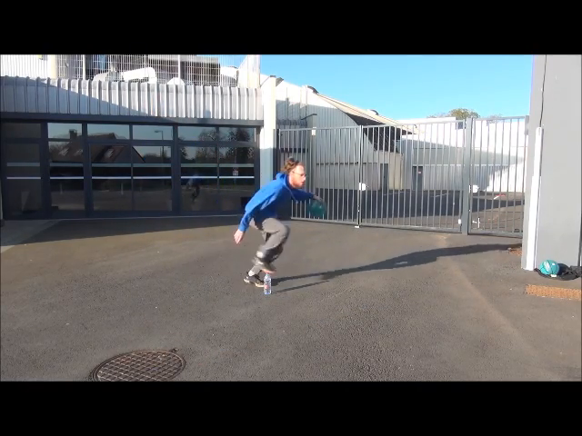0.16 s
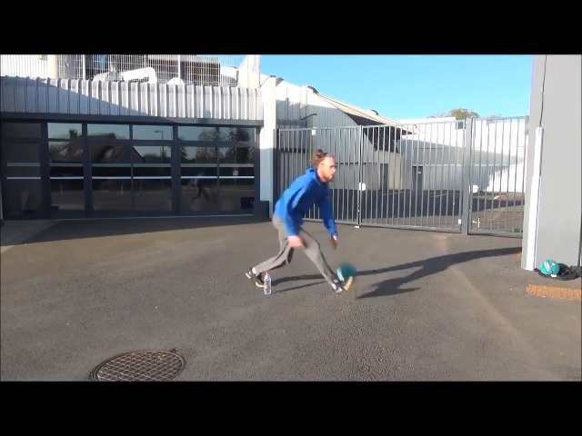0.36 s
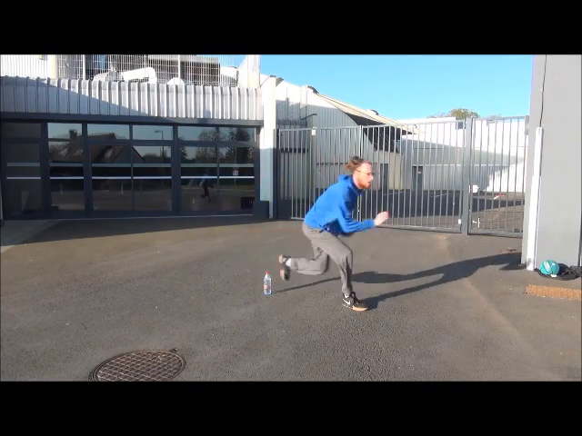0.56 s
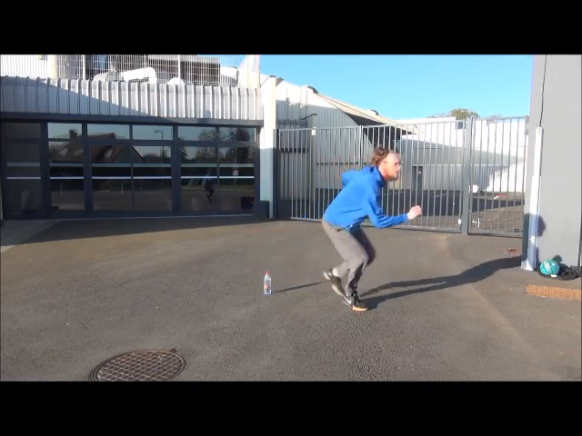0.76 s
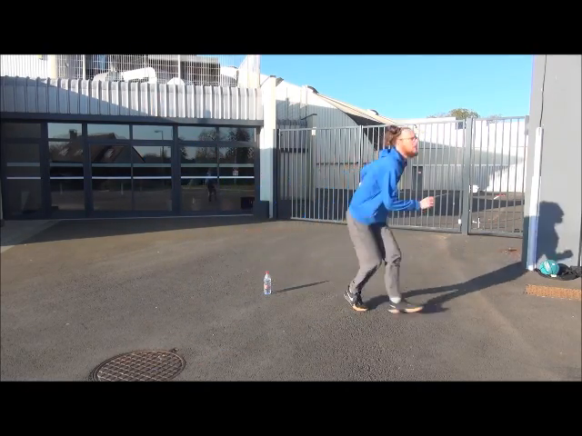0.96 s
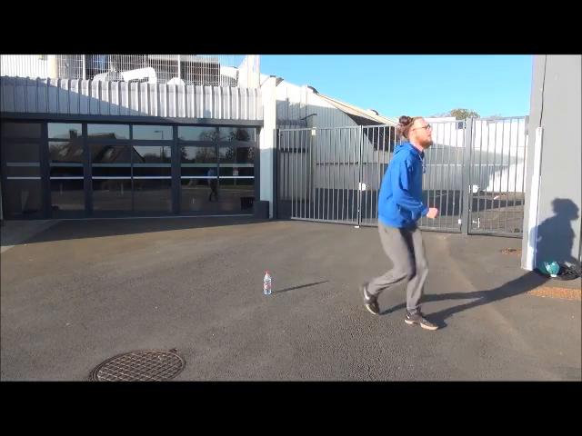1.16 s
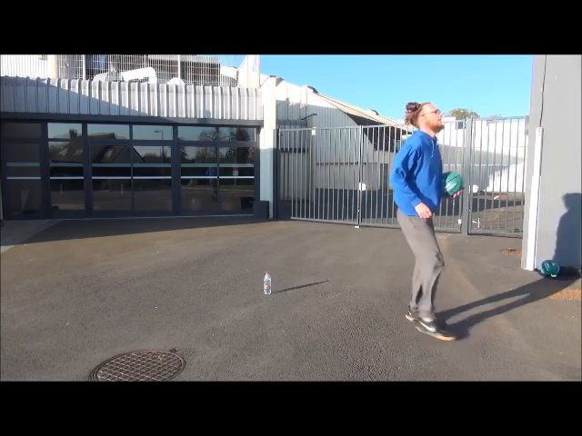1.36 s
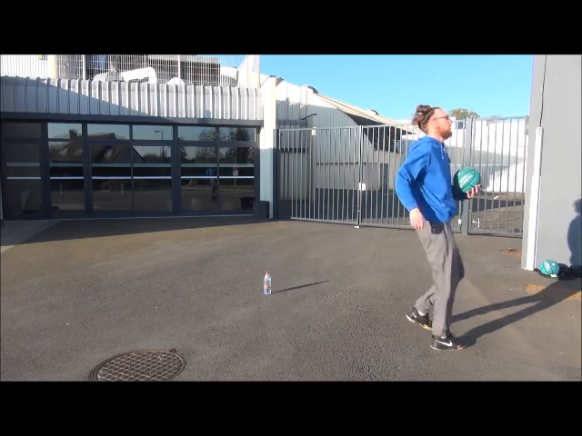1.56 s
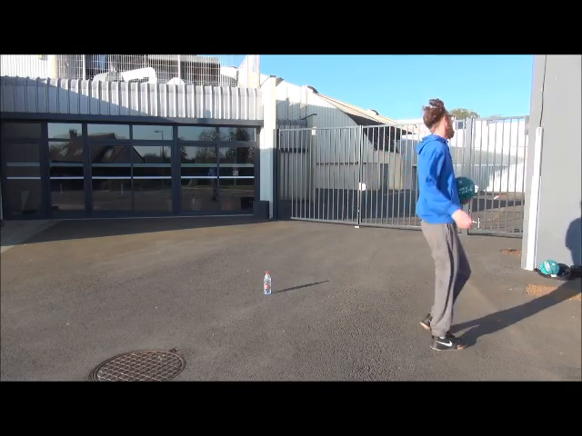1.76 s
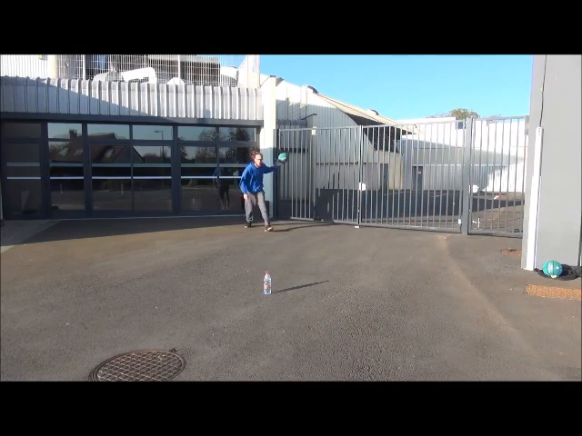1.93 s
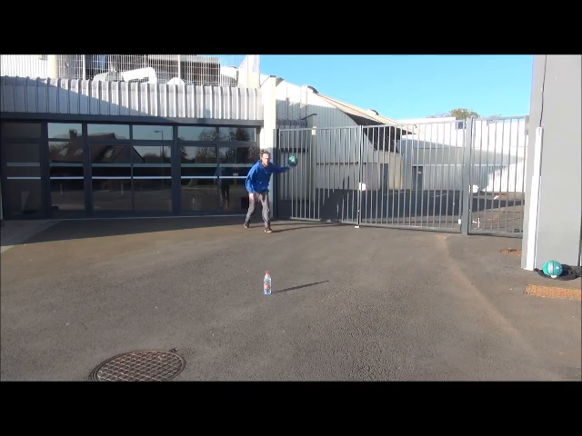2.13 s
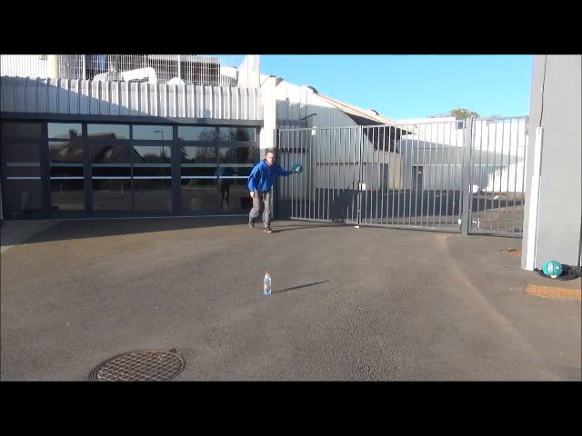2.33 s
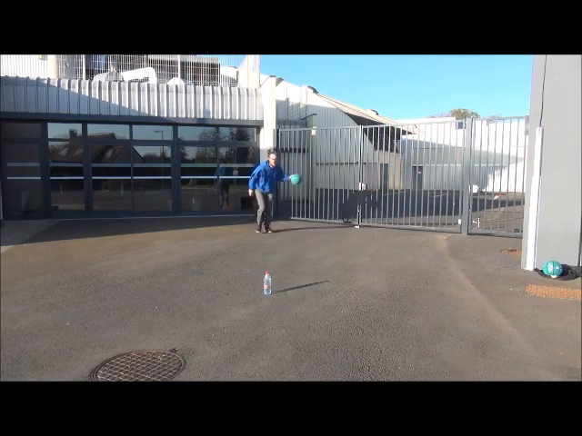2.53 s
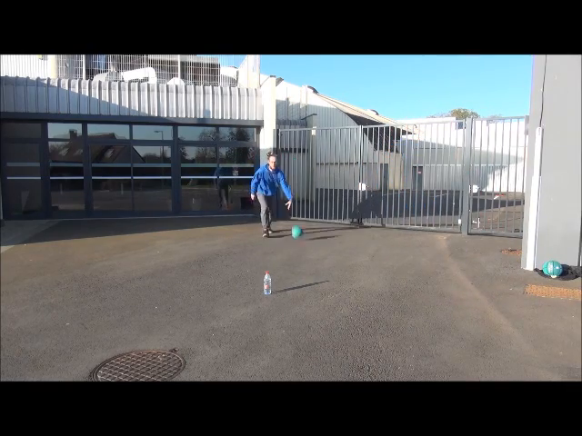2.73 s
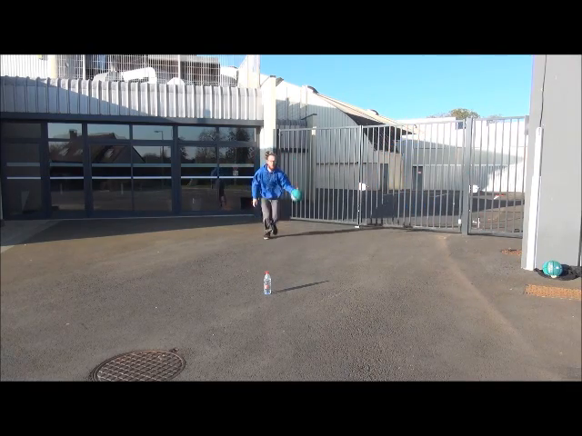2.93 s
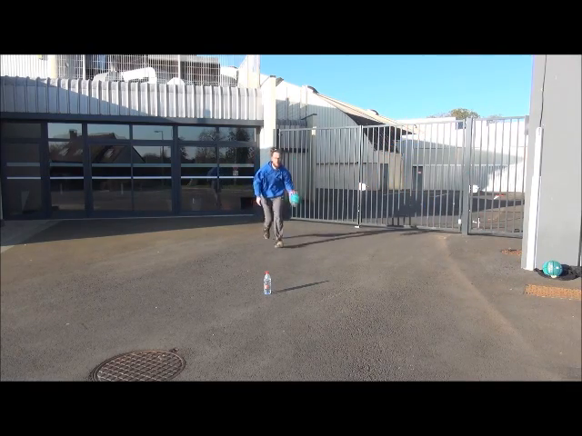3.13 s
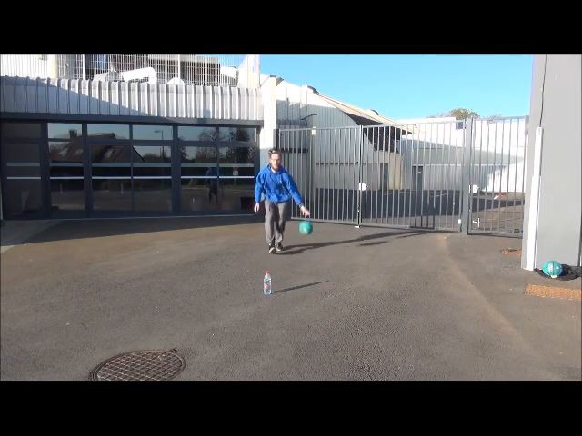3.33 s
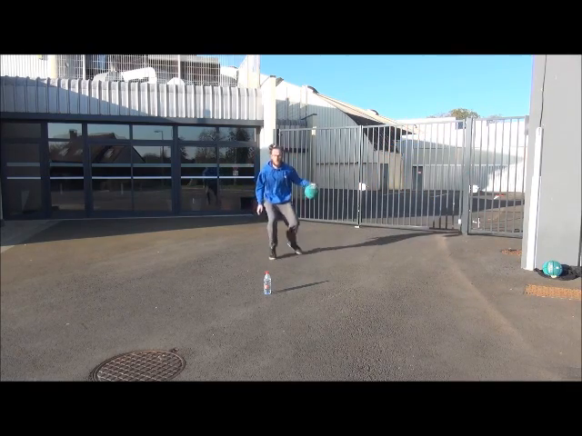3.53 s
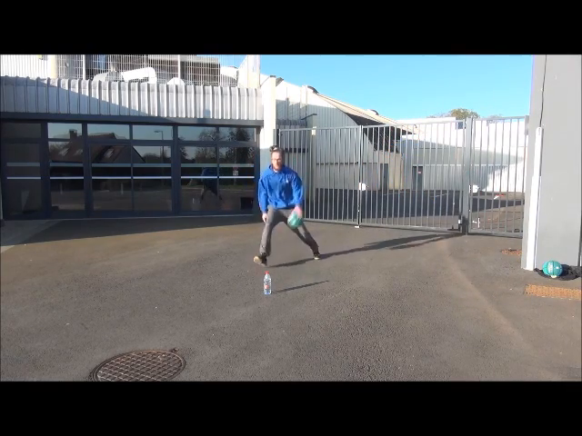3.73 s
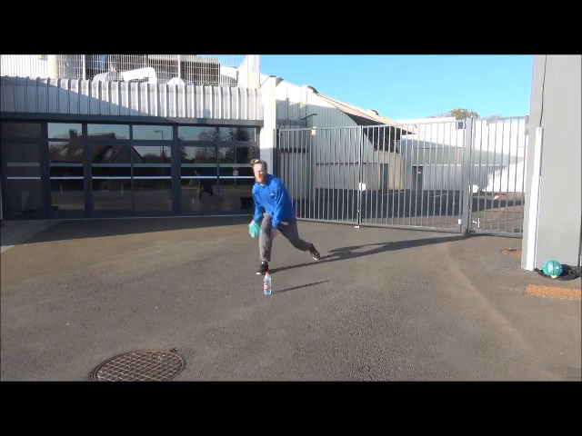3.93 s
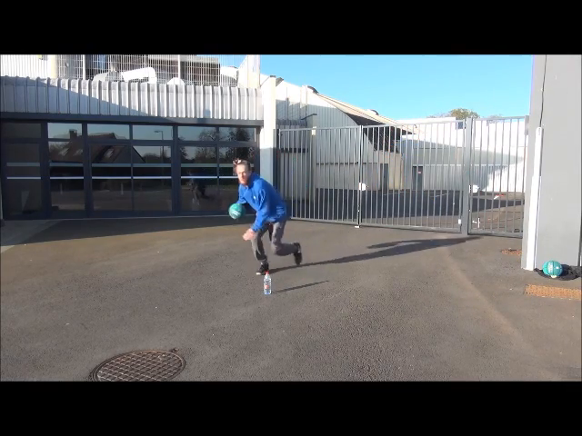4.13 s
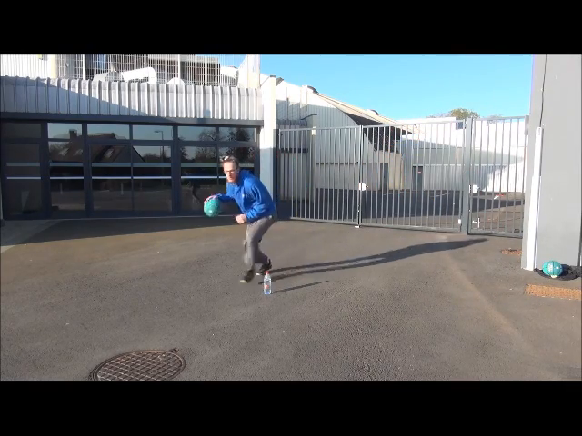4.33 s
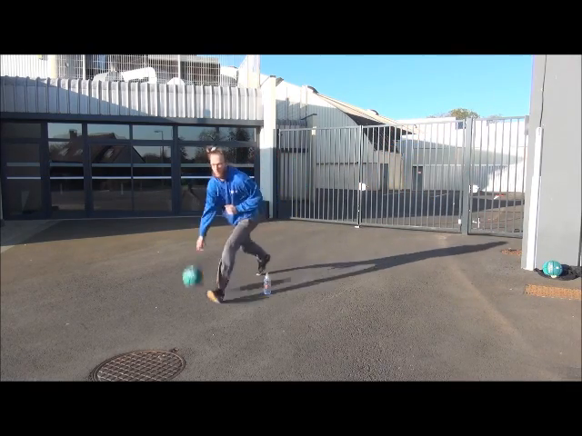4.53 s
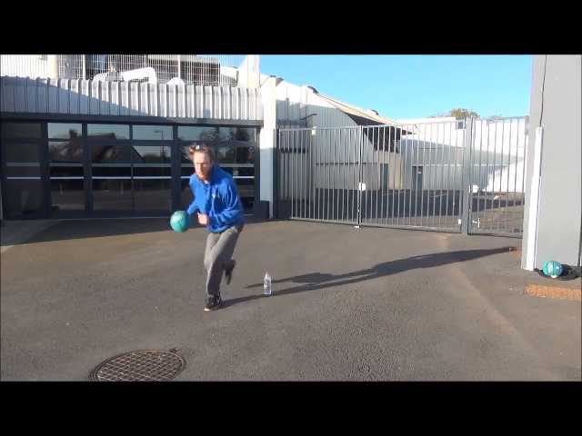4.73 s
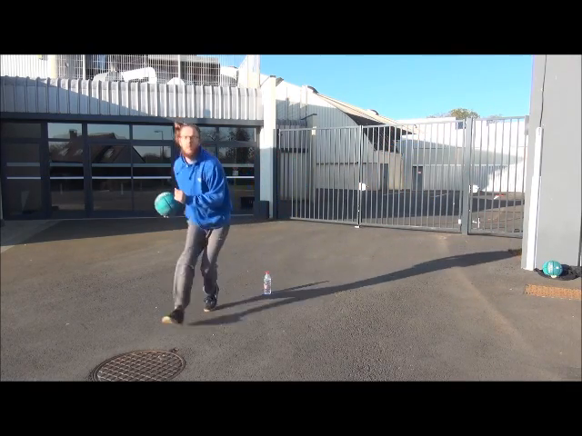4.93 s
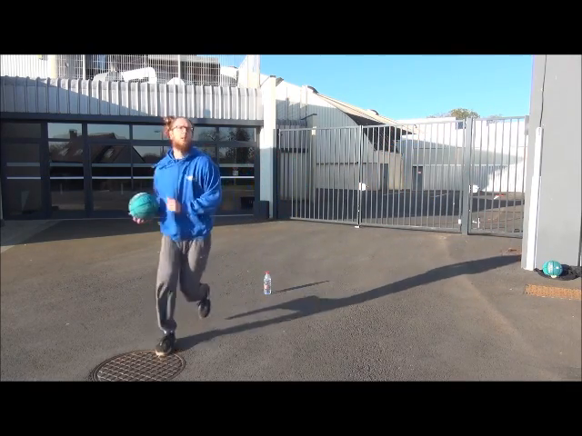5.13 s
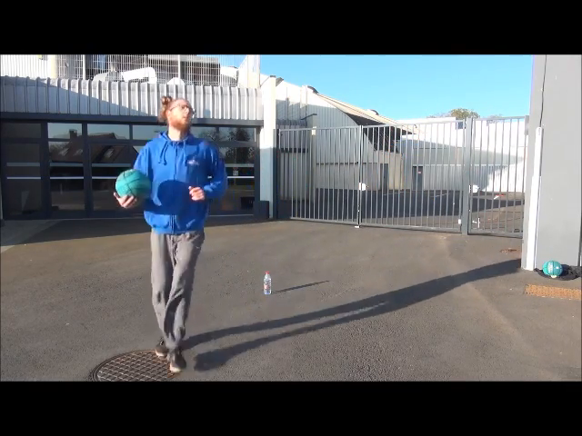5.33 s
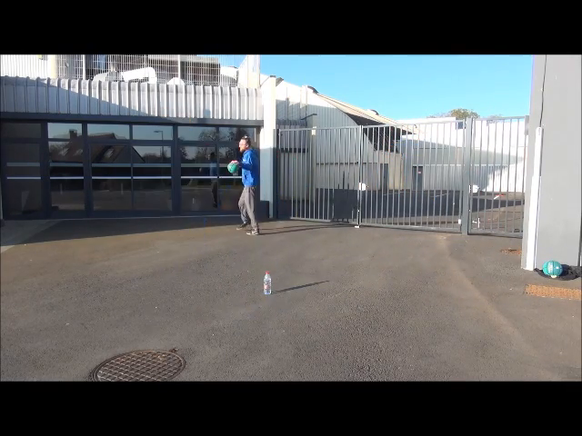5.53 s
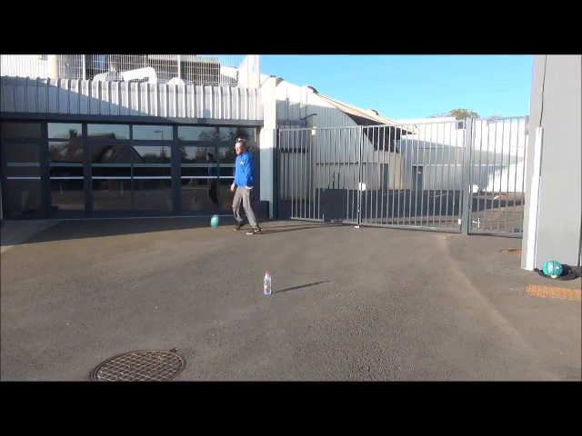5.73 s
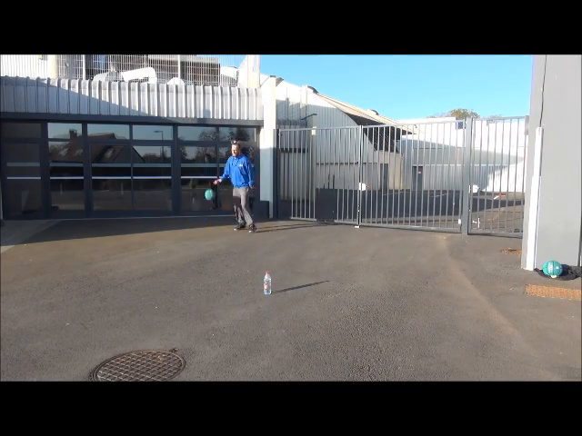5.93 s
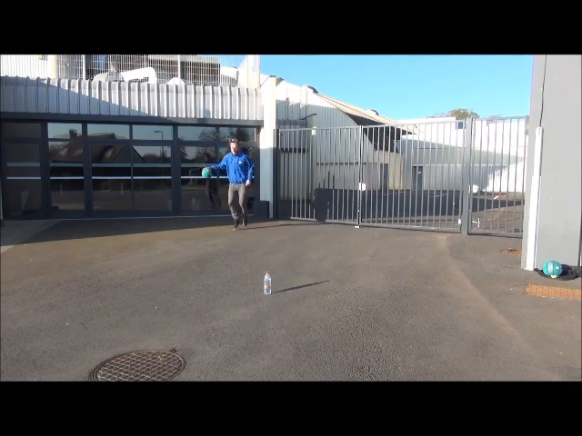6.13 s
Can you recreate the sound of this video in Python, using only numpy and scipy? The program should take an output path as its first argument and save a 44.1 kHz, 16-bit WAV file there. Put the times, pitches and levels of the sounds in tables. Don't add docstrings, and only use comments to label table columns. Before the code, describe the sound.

A paved outdoor yard with hard walls, heard from a fixed stereo microphone over quiet distant traffic and uneven low wind. Faint grit slides come first, then at about 0.46 s a rubber ball hits asphalt: bright slap, brief hollow ring, low thump, quick smeared wall echoes and a short reverberant tail. A long pause holds soft footfalls and a gritty sole drag from 1.6 to 1.95 s. Bounces return at 2.85, 3.36, 3.93 and 4.6 s, varying in pitch, with scuffs and small squeaks around 3.2 s and a strong scuff at 4.13 s. The 4.6 s hit is full and close, and a drain cover rings thinly after it. A low fan hum swells around 4 to 4.8 s; faint high whines come and go. Dull thuds cluster at 5.5 to 5.8 s before a hard, dry final slap at 5.88 s, its echo still fading at the end, 6.3 s.

```python
import sys
import numpy as np
from scipy import signal
from scipy.io import wavfile
from scipy.ndimage import uniform_filter1d

SR = 44100
rng = np.random.default_rng(int(sys.argv[2]) if len(sys.argv) > 2 else 0)


def inscribe(sig):
    pcm = np.round(np.clip(np.atleast_2d(sig).T, -1, 1) * 32767)
    wavfile.write(sys.argv[1], SR, pcm.astype(np.int16))


def convert_level_to_amplitude(level_db):
    exponent = np.asarray(level_db, float) / 20
    return 10 ** exponent


N = 276948

# pitch in Hz, level in dB per Hz.
TRAFFIC_COLOUR = [(30, -8), (60, -7), (120, -14), (250, -5.5), (500, -8), (900, -6.5), (1700, -12),
                  (3300, -15), (5600, -23.5), (8000, -29.5), (11000, -37)]
# time in seconds, level in dB, left minus right in dB.
TRAFFIC_LEVEL = [(0, -47, -0.6), (.9, -49, -0.3), (1.7, -48, -1), (2.25, -51, 1.4), (2.8, -47.5, 1),
                 (3.7, -50, -0.5), (4.2, -47, 0.5), (4.55, -51, 1.2), (5.1, -47.5, 1.3), (5.6, -48.5, -1),
                 (6.28, -46.5, -2)]
# time in seconds, level in dB.
WIND_LEVEL = [(0, -55), (.9, -43.5), (1.25, -64), (1.45, -43), (1.95, -55), (2.25, -49.5), (2.65, -99),
              (2.8, -43.5), (3.3, -50), (3.55, -40.5), (3.75, -47.5), (4.2, -38.5), (4.55, -42),
              (4.75, -35.5), (5.1, -46.5), (5.6, -49.5), (6.15, -41), (6.28, -54)]
# middle in seconds, half length in seconds, level in dB.
FAN_SWELLS = [
    (1.25, .15, -70),
    (2.453, 0.27, -56.5),
    (3.598, 0.11, -67),
    (4.12, 0.44, -41.5),
    (4.703, 0.21, -40.5),
    (5.67, 0.18, -44),
    (5.997, 0.26, -48),
]
FAN_HZ, FAN_REST_DB = 143.4, -59.5
# pitch in Hz, width in Hz, level in dB.
WHINE_LINES = [(3100, 450, 0), (5500, 330, 0)]
# start in seconds, length in seconds, level in dB.
WHINE_SPELLS = [
    (1.0, .38, -64),
    (2.56, .3, -62),
    (3.96, .34, -60),
    (5.28, .3, -62),
    (6.08, .2, -62),
]
# start in seconds, length in seconds, pitch in Hz,
# width in Hz, level in dB.
SQUEAKS = [
    (3.186, .032, 3050, 90, -46),
    (3.2, .024, 3600, 90, -48),
    (3.245, .03, 2400, 120, -52),
    (4.88, .24, 4450, 40, -63),
    (5.3, .28, 4450, 50, -63),
    (.55, .07, 1230, 90, -45),
    (.61, .1, 1290, 90, -41.5),
    (.6, .1, 760, 90, -44),
    (2.89, .11, 1250, 250, -40),
    (5.96, .2, 1100, 700, -42),
]
# time in seconds, level in dB,
# centre in Hz, left minus right in dB, length in ms.
THUDS = [(.4, -51, 300, 3, 6.4), (1.138, -42, 170, -7, 10), (1.403, -43.5, 240, -6, 15),
         (1.487, -49, 227, -11, 20), (1.553, -40, 280, -3, 8.1), (2.133, -40.5, 177, 3, 17),
         (2.689, -47, 212, 6, 17), (3.613, -38, 352, -5, 7.5), (4.822, -34, 706, 1.1, 5.6),
         (5.116, -29, 263, 2.5, 3.5), (5.53, -40, 900, 3, 4.9), (5.562, -31, 193, -4.5, 9.1),
         (5.591, -29.5, 163, -4, 21), (5.675, -38.5, 195, -5, 15), (5.721, -35, 162, -3, 19),
         (5.779, -32.5, 188, -3.5, 17), (5.825, -40, 210, -5, 29)]
# time in seconds,
# level in dB, centre in Hz, left minus right in dB, length in ms.
SCUFFS = [(0.458, -35, 347, 11, 3), (0.641, -42, 1200, -3, 15), (0.668, -43, 1970, -2.1, 38),
          (1.241, -35, 1080, -2.5, 1.6), (1.796, -33, 1060, -13, 14), (3.05, -33.5, 1140, 0, 20),
          (3.238, -40.5, 483, 2.1, 9.4), (3.75, -36, 900, 0.1, 1.9), (3.892, -35.5, 496, 3, 3.8),
          (4.117, -38, 1500, 2.1, 10), (4.134, -25.5, 1380, 1.1, 10.4), (4.593, -22, 720, 8, 2.6),
          (4.712, -41, 2740, 3.5, 40), (5.112, -34, 1100, 1, 2.7)]
# time in seconds, level in dB, length in ms.
SLIDES = [(0.144, -48, 5), (0.169, -44, 26), (0.189, -43, 4), (.208, -42, 3.6), (0.579, -51, 18),
          (1.512, -44, 5.9), (3.192, -40.5, 12), (3.238, -33, 10.4), (3.274, -45, 19), (3.471, -38, 5.3),
          (3.55, -43.5, 27), (3.686, -39, 3.1), (3.711, -53, 2.2), (3.726, -46, 2.2), (3.763, -47, 8.9),
          (3.875, -48, 2.5), (3.919, -37, 3.4), (4.115, -39, 14), (4.132, -35, 11.5), (4.712, -42, 17),
          (5.113, -33, 4), (5.254, -39.5, 4.2), (5.7, -49, 41), (5.801, -48.5, 90)]
THUD_HISS_DB, SCUFF_HISS_DB = -23, -15.5
SLIDE_BODY_DB, SLIDE_HZ, SLIDE_PAN_DB = -14, 2140, 1
# time in seconds, pressure in dB.
DRAG_PRESSURE = [(1.61, -31), (1.635, -27.5), (1.65, -33), (1.668, -27.5), (1.69, -34), (1.715, -32),
                 (1.765, -33), (1.85, -39.5), (1.955, -45)]
# pitch in Hz, width in Hz, level in dB.
DRAG_PEAKS = [(490, 70, 1), (680, 60, 0), (1080, 300, -3), (1400, 250, -3), (2000, 330, -2),
              (2700, 700, -7.5), (3800, 1200, -13)]
DRAG_HISS_DB, DRAG_PAN_DB = -27, -5
# pitch in Hz, level in dB, seconds to fade by 60 dB.
DRAIN_COVER = [(2872, -44, 2.1), (2879, -44.5, 2.1), (3520, -48, 1.3), (3900, -50, .9)]
# centre in Hz, level in dB, seconds to fade by 60 dB.
YARD_BANDS = [(120, 11, 0.94), (300, -21, .7), (800, 23.5, 1), (1500, 10.5, 0.72), (2950, 2.5, 1),
              (6000, -44, 0.59), (9500, -35, 0.27)]
# ball's contact in ms, yard tail in dB, early scatter in dB,
# yard bass in dB, yard treble in dB.
SPOTS = [(12.76, -0.7, -1, -2.5, 8.5), (11.2, 1.9, 12, -3, 7), (11.8, 1, -2, 10, 4.5),
         (13.2, 0.2, 2, -1.1, 6.5), (12.95, .6, -1, 1, 9), (11.6, 0, 9, 13, 10.5)]
PLACES = [(8.66, 5.42), (4.94, 2.57), (6.17, 3.6), (6.95, 4.51), (8.5, 6.1), (3.94, 2.74)]
# glass in dB, its extra ring in dB, door recess in dB,
# gate in dB, second trip to the glass in dB.
FACING = [(-5.5, 3.5, -8, -2, -10.5), (2, -4, -1, -1.5, -5), (-3, -5, 0.7, 1.5, -3.5),
          (2, -0.5, -2, 0.5, -5), (0.8, -1.1, 0.7, -1.5, -5), (1, 3.8, -6, 0, 6.5)]
# slap in dB, ring in dB, thump in dB, left minus right in dB.
GLASS, RECESS = (-7, -4, -2.5, .6), (-13, -10.5, -6.5, .6)
GATE, GLASS_AGAIN = (-15.5, -20, -15, -6.5), (-24, -15, -9, 0.5)
RECESS_M = .93
SMEAR_MS_PER_M, GATE_SMEAR_MS, WALL_BLUR = 0.46, 3.3, 0.46
# time in seconds, slap in dB, ring in dB, thump in dB, ring pitch factor.
BOUNCES = [
    (0.4624, -6.5, -4.5, -14.5, 1.01),
    (2.852, -4.5, -11.5, -20.5, 1.12),
    (3.3573, -5, -5.5, -13, 0.93),
    (3.928, -5, -8, -13, 0.9),
    (4.5977, -4.5, -7, -11, .97),
    (5.884, -2, -10, -25, 1.07),
]
# centre in Hz, width in Hz, level in dB.
SLAP = [(1620, 4400, 28), (3540, 2800, -25.5), (6550, 1600, 7.5), (8800, 3000, 0)]
# pitch in Hz, level in dB, seconds to fade by 60 dB.
RING = [(795, 3, 0.047), (1041, -5, 0.097), (1318, 4.5, 0.033), (2056, -10.5, 0.048)]
# pitch in Hz, level in dB, seconds to fade by 60 dB.
THUMP = [(123, -8, 0.05), (146, -5.3, 0.07), (212, 3, 0.039), (299.5, -0.4, 0.055), (414, 2, 0.033)]
BALL_PAN_DB, TAIL_DB, LIFT_OFF_DB = 1.5, -42.5, -8.5
THUMP_PHASE = 0.62
TOP_HZ = 11050


def unit(x):
    return x / np.sqrt(np.mean(x ** 2))


def band(x, hz, width_hz):
    return signal.lfilter(*signal.iirpeak(min(hz, 12000), hz / width_hz, SR), x)


def steep(x, hz, width_hz):
    return band(band(x, hz, width_hz), hz, width_hz)


def curve(table):
    s, *columns = np.transpose(table)
    return [np.interp(np.arange(N) / SR, s, column) for column in columns]


def walk(rate):
    hold = int(SR / rate)
    steps = np.repeat(rng.standard_normal(N // hold + 1), hold)
    return 2.024 * uniform_filter1d(uniform_filter1d(steps, hold), hold)[:N]


def stereo(mid, side):
    return mid + side * np.array([[1], [-1]])


def add(out, x, s, pan_db):
    i = int(s * SR)
    x = x[..., :N - i]
    out[:, i:i + x.shape[-1]] += x * convert_level_to_amplitude(stereo(0, pan_db / 2))


def traffic():
    hz_points, db_points = np.transpose(TRAFFIC_COLOUR)
    hum = 0
    for hz in 40 * 2 ** np.arange(0, 8.3, 1 / 3):
        mid, side = (steep(rng.standard_normal(N), hz, hz / 3) for _ in range(2))
        db = np.interp(np.log(hz), np.log(hz_points), db_points) + 0.63 * walk(4.84)
        hum = hum + convert_level_to_amplitude(db) * stereo(mid, (0.12 + 0.14 * hz / 10000) * side)
    hum = hum / np.std(band(hum[0], 2300, 3230))
    level_db, pan_db = curve(TRAFFIC_LEVEL)
    return hum * convert_level_to_amplitude(stereo(level_db, pan_db / 2))


def wind():
    level_db, = curve(WIND_LEVEL)
    gust = band(band(rng.standard_normal((2, N)), 113, 250), 164, 253)
    return unit(stereo(gust[0], 0.15 * gust[1])) * convert_level_to_amplitude(level_db - 1 + 1.2 * walk(27))


def fan():
    t = np.arange(N) / SR
    swell = convert_level_to_amplitude(FAN_REST_DB)
    for middle, half, db in FAN_SWELLS:
        swell = swell + convert_level_to_amplitude(db) * np.exp(-((t - middle) / half) ** 2)
    turns = np.cumsum(FAN_HZ + 1.323 * walk(4.3)) / SR
    return 1.23 * np.sin(2 * np.pi * turns) * swell * convert_level_to_amplitude(-2.5)


def whines_and_squeaks():
    out = np.zeros((2, N))
    spells = [(start, length, hz, width, db + line_db)
              for start, length, db in WHINE_SPELLS for hz, width, line_db in WHINE_LINES]
    for start, length, hz, width, db in spells + SQUEAKS:
        size = int(length * SR)
        line = unit(band(band(rng.standard_normal(SR)[:size], hz, width), hz, 3 * width))
        fade = signal.windows.tukey(size, .5)
        add(out, line * fade * convert_level_to_amplitude(db + 1.0 * walk(26)[:size]), start, 0)
    return out


def grit(size, spread_db):
    return unit(rng.standard_normal(size) * convert_level_to_amplitude(spread_db * rng.exponential(size=size)))


def steps():
    out = np.zeros((2, N))
    ms = np.arange(-2000, 4000) / SR * 1000
    rows = [(s, db, hz, db + THUD_HISS_DB, pan, length) for s, db, hz, pan, length in THUDS]
    rows += [(s, db, hz, db + SCUFF_HISS_DB, pan, length) for s, db, hz, pan, length in SCUFFS]
    rows += [(s, db + SLIDE_BODY_DB, SLIDE_HZ, db, SLIDE_PAN_DB, length) for s, db, length in SLIDES]
    for s, db, hz, hiss_db, pan, length in rows:
        grains = grit(len(ms), 2.4)
        body = unit(steep(grains, hz, 0.79 * hz))
        hiss = unit(0.31 * np.diff(grains, 2, prepend=[0, 0]) + 0.9 * band(grains, 5000, 9100))
        swell = np.exp(-np.where(ms < 0, (ms / length) ** 2, ms / length))
        add(out, (convert_level_to_amplitude(db) * body + convert_level_to_amplitude(hiss_db) * hiss) * swell, s - 2000 / SR, pan)
    return out


def drag():
    pressure_db, = curve(DRAG_PRESSURE)
    grains = grit(N, 3.3)
    body = 0
    for hz, width, db in DRAG_PEAKS:
        body = body + convert_level_to_amplitude(db + 1.0 * walk(60)) * steep(grains, hz, 1.8 * width)
    body = unit(signal.sosfilt(signal.butter(3, [360, 6500], "band", fs=SR, output="sos"), body))
    hiss = unit(steep(grains, 4200, 1700))
    on = (np.arange(N) > 1.616 * SR) & (np.arange(N) < 1.952 * SR)
    level = convert_level_to_amplitude(stereo(pressure_db + 1.1 * walk(80), DRAG_PAN_DB / 2))
    return on * (body + convert_level_to_amplitude(DRAG_HISS_DB) * hiss) * level


def drain_cover():
    out = np.zeros((2, N))
    t = np.arange(SR) / SR
    ringing = sum(convert_level_to_amplitude(db) * np.cos(2 * np.pi * hz * (t - .108)) * 1000. ** (-t / t60)
                  for hz, db, t60 in DRAIN_COVER)
    add(out, ringing * np.minimum(t * 100, 1), BOUNCES[4][0], 0)
    return out


def yard(db, early_db, bass_db, treble_db):
    t = np.arange(int(.9 * SR)) / SR

    def diffuse():
        total = 0
        for hz, band_db, t60 in YARD_BANDS:
            tilt_db = bass_db * (hz < 400) + treble_db * (hz > 2000)
            noise = steep(rng.standard_normal(len(t)), hz, 1.38 * hz)
            total = total + convert_level_to_amplitude(band_db + tilt_db) * noise * 1000. ** (-t / t60)
        return total

    mid, side = diffuse(), diffuse()
    scatter_db = early_db * np.exp(-t / 0.016)
    shape = (1 - np.exp(-t / 0.012)) * convert_level_to_amplitude(db + scatter_db + 1.6 * walk(58.3)[:len(t)])
    return shape * stereo(mid, 0.035 * side + 0.25 * np.diff(side, prepend=0))


def modes(table, t, phase, detune):
    x = 0
    for (hz, db, t60), p, d in zip(table, phase, detune):
        x = x + convert_level_to_amplitude(db) * np.sin(2 * np.pi * hz * (1 + d) * t + p) * 1000. ** (-t / t60)
    return x / np.abs(x).max()


def bounce(slap_db, ring_db, thump_db, smear_ms, pitch, contact_s, chance):
    t = np.arange(4000) / SR
    rough = rng.standard_normal(len(t))
    push = rough * (0.17 * np.exp(-t * 1000 / smear_ms) + 0.021 * np.exp(-t / 0.0087))
    push[:3] += 1.5 / smear_ms
    push = push + 0.53 * np.roll(push, int(22 + 5 * np.clip(chance[0, 4], -2, 2)))
    slap = sum(convert_level_to_amplitude(db) * steep(push, hz, width) for hz, width, db in SLAP)
    slap = slap / np.abs(slap).max()
    dip = 0.41 + 0.93 * np.cos(2 * np.pi * (t - .0025) / (0.78 * contact_s))
    squash = np.where(t < contact_s, dip, .4) * np.exp(np.minimum(t, contact_s) * 90)
    ring = modes(RING, t * pitch, chance[0], 0.03 * chance[1]) * uniform_filter1d(squash, 40)
    rise = (1 - np.exp(-t * 1000 / (0.62 + 0.44 * smear_ms))) ** 2
    thump = modes(THUMP, t, THUMP_PHASE + 0.52 * chance[2], 0.081 * chance[3])
    thump = thump + convert_level_to_amplitude(LIFT_OFF_DB) * np.roll(rise * thump, int(0.834 * contact_s * SR))
    x = convert_level_to_amplitude(slap_db + 1.5) * slap + rise * (convert_level_to_amplitude(ring_db) * ring + convert_level_to_amplitude(thump_db + 13.0) * thump)
    x = signal.sosfilt(signal.butter(3, 95, "high", fs=SR, output="sos"), x)
    return np.pad(x, (round(.0007 * SR), 0))


def ball():
    out = np.zeros((2, N))
    for hit, place, facing, spot in zip(BOUNCES, PLACES, FACING, SPOTS):
        s, *layers_db, pitch = hit
        front, gate = place
        glass_db, ring_db, recess_db, gate_db, again_db = facing
        contact_ms, tail_db, *colour = spot
        contact_s = contact_ms / 1000
        chance = rng.standard_normal((4, 5))
        add(out, bounce(*layers_db, 1.92, pitch, contact_s, chance), s, BALL_PAN_DB)
        add(out, yard(TAIL_DB + tail_db, *colour), s, -1.5)
        smear = max(SMEAR_MS_PER_M * front, .5)
        echoes = [(GLASS, front, glass_db + ring_db * np.array([0, 1, 0]), smear),
                  (RECESS, front + RECESS_M, recess_db, smear),
                  (GATE, gate, gate_db, GATE_SMEAR_MS),
                  (GLASS_AGAIN, 2 * front, again_db, smear)]
        for wall, metres, db, smear_ms in echoes:
            echo_db = np.add(layers_db, wall[:3]) + db
            blurred = chance + WALL_BLUR * rng.standard_normal((4, 5))
            echo = bounce(*echo_db, smear_ms, pitch, contact_s, blurred)
            add(out, echo, s + 2 * metres / 343, wall[3])
    return out


def scene():
    background = traffic() + wind() + fan() + whines_and_squeaks()
    return background + steps() + drag() + drain_cover() + ball()


def roll_off(x):
    return signal.sosfilt(signal.butter(12, 12230, fs=SR, output="sos"), x)


def record(dry):
    mid = dry.mean(axis=0)
    skew = 0.15 * band(mid, 60, 120) - 0.15 * band(mid, 1010, 600)
    skew = skew + 0.25 * np.roll(steep(mid, 8600, 6500), 3)
    x = signal.sosfilt(signal.butter(2, 70, "high", fs=SR, output="sos"), stereo(dry, skew))
    x = signal.sosfilt(signal.ellip(8, .3, 32, TOP_HZ, fs=SR, output="sos"), np.tanh(x))
    return roll_off(x)


dry = scene()
out = record(dry)
inscribe(out)
```